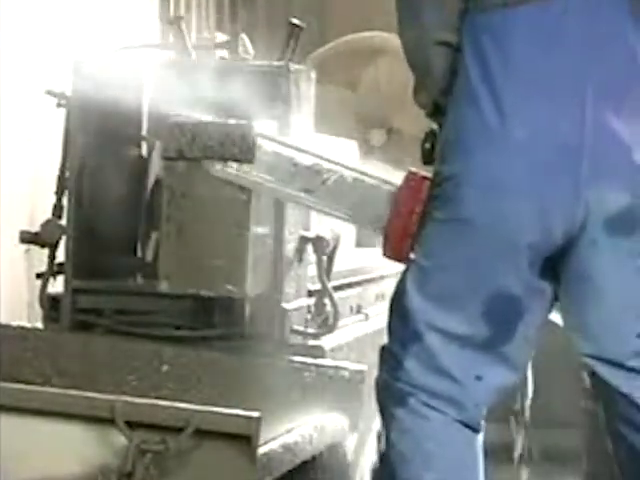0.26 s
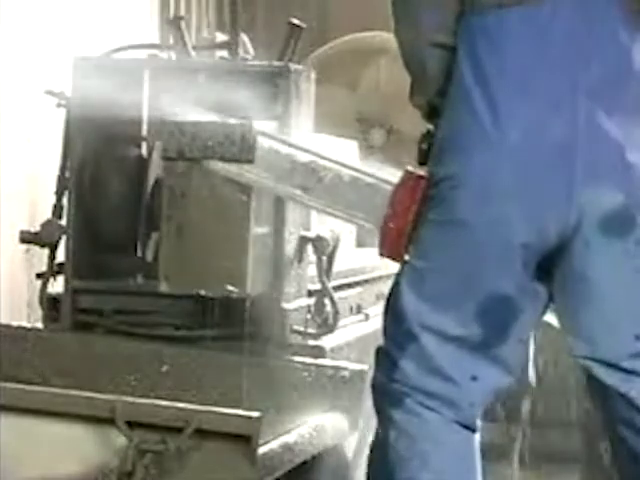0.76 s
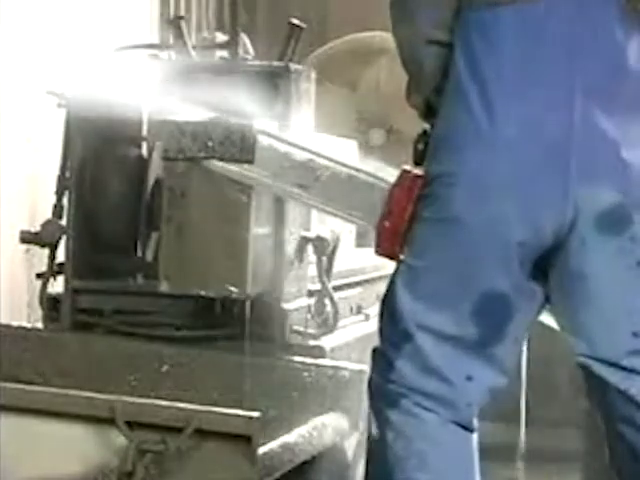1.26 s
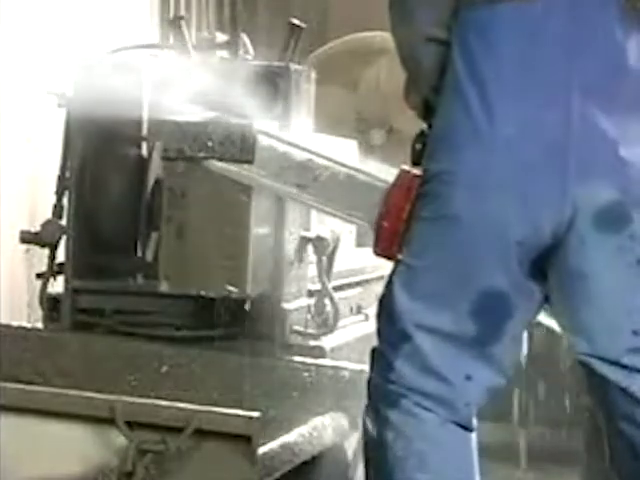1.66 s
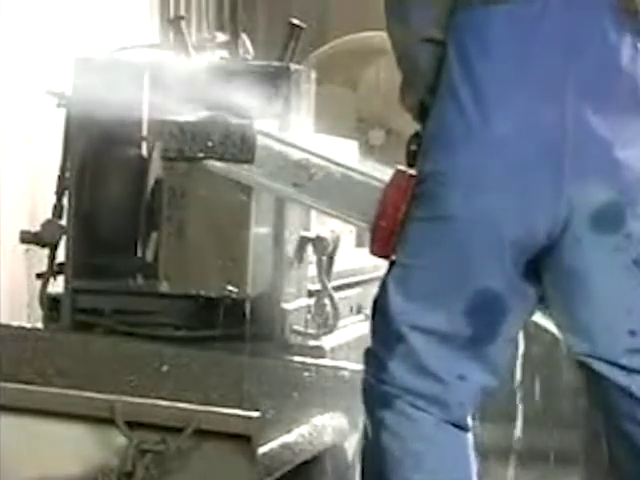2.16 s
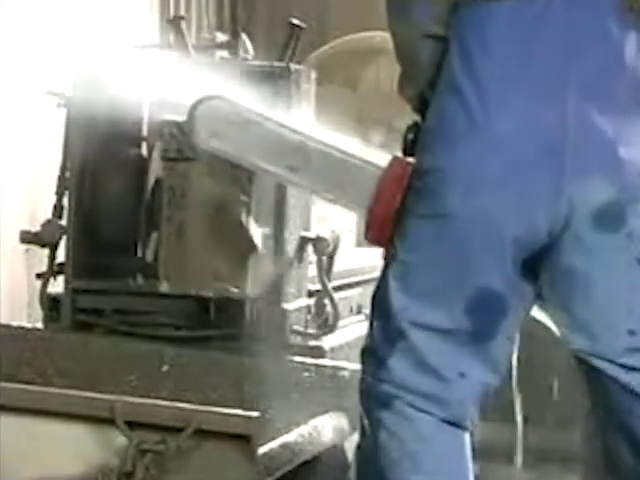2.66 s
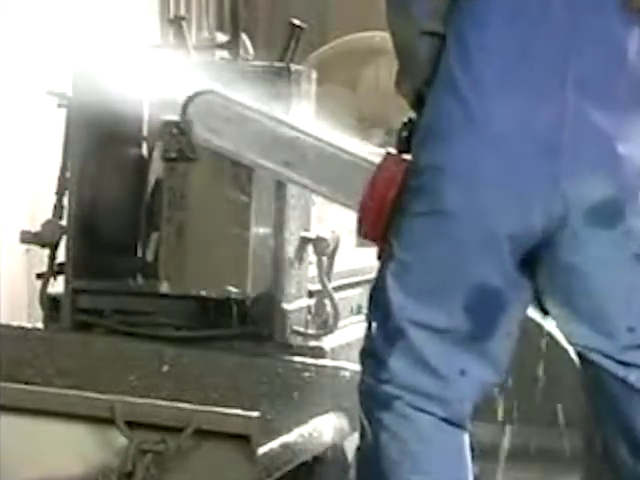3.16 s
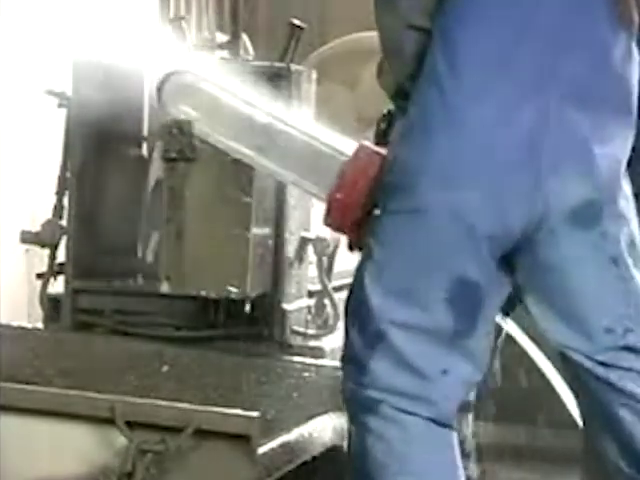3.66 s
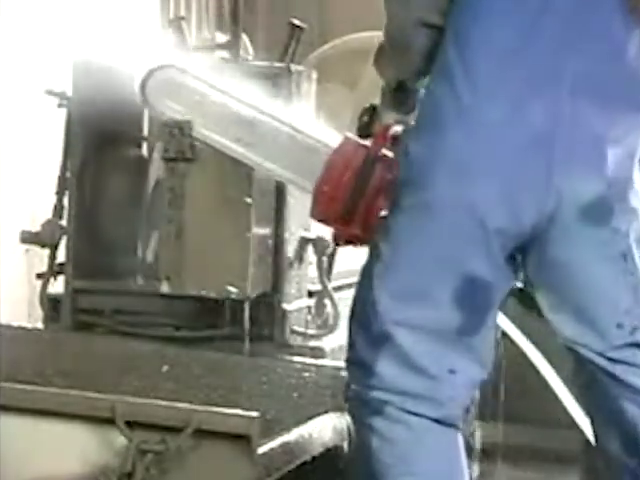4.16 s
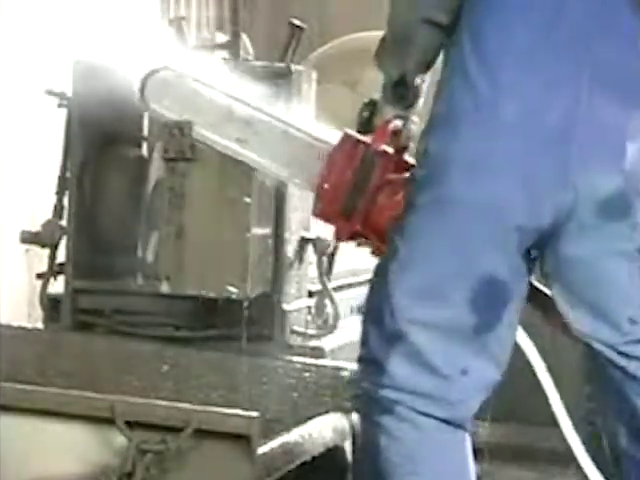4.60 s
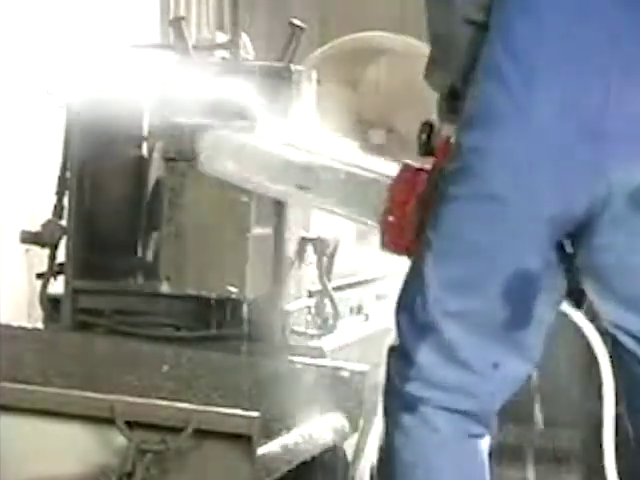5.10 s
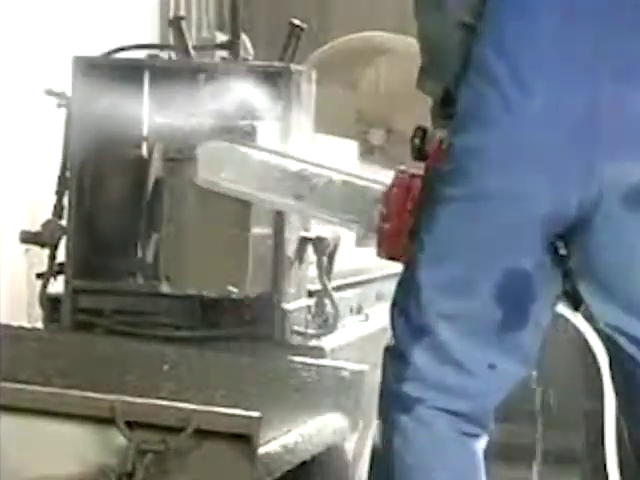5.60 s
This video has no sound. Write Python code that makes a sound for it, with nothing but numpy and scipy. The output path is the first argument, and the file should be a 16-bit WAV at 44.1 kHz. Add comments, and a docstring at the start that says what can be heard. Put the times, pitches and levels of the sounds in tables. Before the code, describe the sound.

An air-powered chain saw cuts wet concrete a few metres away in a hard-walled workshop with a short echo. A loud, bright hiss of exhaust air and water spray runs for the whole six seconds, growing slightly. From the start, the teeth grind with a gritty scrape and the steel bar rings lightly. A faint, wavering motor whine sags at about 0.7 seconds as the saw bites, then climbs by 1.8 seconds. It dips again around 2.3 seconds, with bright raking scrapes until about 2.7. Near 2.9 seconds the chain catches at the edge in a few quick chatters. From about 3.2 seconds the grinding fades away, leaving the hiss and a higher, rougher whine. Brief metallic rings and chain rattles come between 5.2 and 5.8 seconds. A low machine hum and rumble sit quietly underneath throughout.

```python
"""Air chain saw in wet concrete

An air-driven chain saw cuts a block a few metres away in a workshop. Air pulses from its rotor make
a whine that sags under load and climbs as the bar lifts. Diamond teeth scrape grit and ring the steel
bar, exhaust air and water spray hiss throughout, and a machine hums low in the background."""
import sys
import numpy as np
from scipy import signal
from scipy.fft import rfft, irfft
from scipy.io import wavfile
from scipy.ndimage import uniform_filter1d

SR = 44100
rng = np.random.default_rng(int(sys.argv[2]) if len(sys.argv) > 2 else 0)


def bounce(signal):
    """Save signal as a 16-bit WAV file at the path given by the first command-line argument."""
    frames = np.transpose(np.atleast_2d(signal))
    limited = np.clip(frames, -1, 1)
    pcm = np.round(limited * 32767).astype(np.int16)
    wavfile.write(sys.argv[1], SR, pcm)


N = 257544


# The saw is pressed in and eased off. Each row: time in seconds, rotor speed in Hz.
ROTOR_SPEED = [(0, 467.2), (.35, 471), (.5, 453.4), (.68, 396.6), (.84, 396), (.97, 466), (1.12, 506.8),
               (1.45, 509.6), (1.77, 581), (1.95, 540.8), (2.08, 535.7), (2.22, 484.7), (2.34, 460.1),
               (2.44, 473), (2.58, 504), (2.74, 514.4), (2.92, 586.5), (3.12, 593.6), (3.33, 551),
               (3.58, 540.8), (3.78, 616.4), (4.04, 562), (4.45, 548.1), (4.76, 565), (4.87, 647.7),
               (5.12, 623), (5.26, 598.6), (5.51, 595.4), (5.64, 545), (5.84, 551)]
def rotor_speed(inertia_s=0.085):
    """The vane motor's speed in Hz; the mass of rotor and chain rounds off every change."""
    return uniform_filter1d(curves(ROTOR_SPEED)[0], int(inertia_s * SR))


def motor(hz, jitter=0.0056):
    """The motor's pitched voice. Snags of the chain jerk its speed, the more so when it races."""
    unevenness = jitter * (hz / np.mean(hz)) ** 4
    angle = turn(hz * (1 + unevenness * walk(83)))
    return whine(hz, angle) + singing(angle) + growl(angle)


# The muffler's tone, with a metallic peak near 1.8 kHz. Each row: frequency in Hz, level in dB.
MUFFLER_TONE = [(770, -32), (870, -30.5), (945, -32), (1020, -31), (1110, -38.5), (1180, -41.5),
                (1270, -37.5), (1410, -44.5), (1520, -43.5), (1660, -41.5), (1740, -42.5), (1780, -38),
                (1835, -40), (1920, -36)]
# Weaker overtones. Each row: multiple of the rotor speed, level in dB against the second order.
UPPER_ORDERS = [(4, -10)]
def whine(hz, angle, held_hz=497, rattle_hz=582, waver_db=2.26):
    """Air pulses sweep through the muffler's tone; at speed the chain rattles loose and smears them."""
    second_db = spectrum_at(2 * hz, MUFFLER_TONE)
    third_db = spectrum_at(3 * hz, MUFFLER_TONE)
    orders = [(2, second_db), (3, third_db)] + [(k, second_db + db) for k, db in UPPER_ORDERS]
    held = sum(undb(db) * partial(k * angle, rough=0.28, spread_hz=42) for k, db in orders)
    rattling = sum(undb(db) * partial(k * angle, rough=0.97, spread_hz=110) for k, db in orders)
    loose_share = np.interp(hz, [held_hz, rattle_hz], [0, 0.7])
    blend = np.sqrt(1 - loose_share) * held + np.sqrt(loose_share) * rattling
    return blend * undb(waver_db * flutter(7))


# Clean moments in the whine. Each row: peak time in seconds, half-width in seconds, level in dB.
CLEAN_SWELLS = [(.14, 0.027, -25.5), (.3, 0.037, -27), (1.03, 0.012, -34), (1.19, 0.022, -30),
                (1.82, .08, -35), (2.24, 0.027, -29), (2.42, 0.029, -33)]
def singing(angle):
    """The chain runs evenly in the kerf and the second order sings out clean."""
    return swells(CLEAN_SWELLS) * np.sqrt(2) * np.cos(2 * angle)


# Deep bites. Each row: peak time in seconds, half-width in seconds, level in dB.
DEEP_BITES = [(.21, 0.023, -42), (.49, 0.036, -40), (.78, 0.21, -37), (1.02, 0.035, -40.5),
              (1.31, 0.019, -34), (1.47, 0.024, -35.5), (2.25, 0.019, -40), (2.47, 0.062, -36)]
def growl(angle):
    """The teeth bite deep and the motor growls at its first order."""
    return swells(DEEP_BITES) * partial(angle, rough=0.4, spread_hz=35)


# Rings in the whine. Each row: peak time in seconds, half-width in seconds, level in dB.
WHINE_RINGS = [(3.05, 0.032, -35.5), (5.32, 0.039, -31.5), (5.49, 0.037, -30)]
def whine_rings(judder, pitch_hz=1788, width_hz=62):
    """Brief metallic rings near 1.8 kHz as the racing motor's third order meets the muffler's peak."""
    return ring([(pitch_hz, width_hz, 0)], judder) * swells(WHINE_RINGS)


def cutting(load, judder_db=1.06):
    """The saw's scraping, ringing and shaking. One judder roughens grit, rubs, whine rings and rakes."""
    judder = undb(judder_db * walk(63))
    bright = grit(load, judder) + rubs(judder) + whine_rings(judder) + guide_bar() + rakes(judder)
    return bright + churn(load) + snatches()


# The bright colour of the grit. Each row: frequency in Hz, level in dB.
GRIT_TONE = [(650, -69), (900, -2), (1200, 0), (1500, 0.5), (2250, 1.5), (3100, 0.5), (3750, 4),
             (4250, -1.5), (4650, 4), (6000, 0), (9000, -1), (15000, -10.5)]
def grit(load, judder, hard_cut_db=-23.5, unloaded_db=-5, clear_s=3.24, fade_s=3.5, fade_db=-45):
    """Crushed grains merge into a hiss that grows with load and dies away as the bar comes clear."""
    clear = np.clip((np.arange(N) / SR - clear_s) / fade_s, 0, 1)
    grains = level(colour(rng.standard_normal(N) * judder, GRIT_TONE), hard_cut_db)
    return grains * undb(unloaded_db * (1 - load) + fade_db * clear)


# The bar's resonances. Each row: pitch in Hz, spread in Hz, relative level in dB.
BAR_MODES = [(2704, 127, -1.5), (2321, 120, -6.5)]
# Its ring as it is pressed on the concrete. Each row: time in seconds, level in dB.
BAR_PRESSURE_RING = [(0, -38), (.35, -34), (.7, -39), (1.0, -33), (1.85, -30.5), (2.3, -33), (2.8, -32),
                     (3.05, -39), (3.6, -36), (4.1, -37), (5.84, -50)]
# The chain slaps the bar. Each row: peak time in seconds, half-width in seconds, level in dB.
CHAIN_SLAPS = [(.06, 0.055, -27), (2.0, .03, -41), (3.63, 0.092, -33), (5.74, 0.06, -30.5)]
def guide_bar(wander=0.016, flicker_db=1.3, shifts_per_s=14):
    """The steel bar rings loosely; the shifting contact detunes it and makes it come and go."""
    detune = 1 + wander * flutter(shifts_per_s)
    modes = sum(undb(db) * partial(turn(hz * detune), rough=0.94, spread_hz=spread)
                for hz, spread, db in BAR_MODES)
    flicker = undb(flicker_db * flutter(shifts_per_s))
    pressed = undb(curves(BAR_PRESSURE_RING)[0])
    return modes * flicker * np.hypot(pressed, swells(CHAIN_SLAPS))


# The teeth's resonances. Each row: pitch in Hz, width in Hz, relative level in dB.
TOOTH_MODES = [(3530, 220, -11), (3710, 170, -5), (4080, 260, -12), (4560, 700, -9)]
# Raking strokes. Each row: peak time in seconds, half-width in seconds, level in dB.
RAKE_SWELLS = [(.05, .1, -30), (.72, 0.11, -35), (2.3, 0.081, -30), (2.56, 0.13, -27), (3.25, 0.12, -38),
               (5.25, 0.074, -34)]
def rakes(judder):
    """The teeth rake along the edge and ring in bright swells."""
    return ring(TOOTH_MODES, judder) * swells(RAKE_SWELLS)


# Side rubs. Each row: peak time in seconds, half-width in seconds, level in dB.
KERF_RUBS = [(0.9, 0.25, -37), (1.6, 0.31, -32)]
def rubs(judder, pitch_hz=6900, width_hz=310):
    """The bar rubs the wall of the kerf and rings high."""
    return ring([(pitch_hz, width_hz, 0)], judder) * swells(KERF_RUBS)


# The chatter's resonances. Each row: pitch in Hz, width in Hz, relative level in dB.
EDGE_MODES = [(360, 40, 6), (511, 18, 7.5), (789, 28, 8.5), (1160, 650, 2)]
# Quick catches. Each row: peak time in seconds, half-width in seconds, level in dB.
EDGE_SNATCHES = [(2.848, 0.018, -28), (2.94, 0.02, -32), (3.05, 0.015, -37)]
def snatches():
    """The chain snatches at the edge as it leaves the block: short, pitched chatter."""
    return swells(EDGE_SNATCHES) * ring(EDGE_MODES, drive=1)


# The block's low body. Each row: frequency in Hz, level in dB.
BLOCK_TONE = [(60, -21), (105, 2.5), (160, -0.5), (230, -4), (310, -4.5), (370, -25), (450, -38)]
def churn(load, hard_cut_db=-40.5, lump_db=6):
    """The teeth shake the block in uneven lumps, louder the harder the cut."""
    lumps = undb(lump_db * flutter(10))
    shaking = level(colour(rng.standard_normal(N), BLOCK_TONE) * lumps, hard_cut_db)
    return shaking * np.sqrt(np.clip(load, 0, 1))


# The colour of air and spray. Each row: frequency in Hz, level in dB.
JET_TONE = [(750, -112), (960, -8), (1080, -8.5), (1220, -17), (1400, -9), (2200, -3.5), (3100, -2),
            (3700, -0.66), (5500, 0), (8000, -0.3), (10200, -4), (11200, -8), (13700, -6.5), (15000, -15)]
def exhaust(start_db=-20, rise_db_per_s=0.5, dip_s=2.67, dip_half_width_s=0.16, dip_db=-1):
    """A turbulent jet and the chain's spray swell as the saw turns out from behind the worker."""
    t = np.arange(N) / SR
    hiss = level(colour(rng.standard_normal(N), JET_TONE), start_db)
    dip = np.exp(-0.5 * ((t - dip_s) / dip_half_width_s) ** 2)  # the tip comes up through the spray
    flutter_db = 0.44 * walk(40)
    return hiss * undb(rise_db_per_s * t + dip_db * dip + flutter_db)


# The background hum. Each row: time in seconds, pitch in Hz, level in dB.
MACHINE_HUM = [(0.0, 66.14, -28.5), (0.23, 74.9, -30), (2.91, 74.38, -32), (4.23, 70, -33),
               (4.67, 71.06, -48), (5.04, 70.1, -34.5), (5.43, 70.7, -45), (5.63, 68.8, -31.5),
               (5.84, 69.3, -34)]
# The shop's low rumble. Each row: frequency in Hz, level in dB.
SHOP_TONE = [(15, -30), (28, -5), (43, 2.5), (62, -1), (90, 3.5), (135, 5.5), (178, -9), (208, 2.5),
             (245, -0.5), (265, -18.5), (290, -0.5), (345, -41), (385, -56)]
def machine(octave_db=-14, waver_db=0.67, rumble_db=-37, shudder_db=0.3):
    """A machine hums with a weak octave over the uneven rumble of the shop."""
    hz, db = curves(MACHINE_HUM)
    angle = turn(hz * (1 + 0.0035 * walk(6.3)))
    tone = np.sin(angle) + undb(octave_db) * np.sin(2 * angle)
    hum = np.sqrt(2) * undb(db + waver_db * walk(15)) * tone
    rumble = colour(rng.standard_normal(N), SHOP_TONE) * undb(shudder_db * flutter(8.7))
    return hum + level(rumble, rumble_db)


def workshop(x, wet_db, t60_s=0.48):
    """Hard walls add a short diffuse tail to the direct sound."""
    t = np.arange(SR // 2) / SR
    tail = rng.standard_normal(len(t)) * np.exp(-np.log(1000) * t / t60_s)
    return x + undb(wet_db) * signal.fftconvolve(x, tail / np.linalg.norm(tail))[:N]


def partial(angle, rough, spread_hz):
    """A tone at rms 1; the rough share of its power is smeared into a band around its pitch."""
    smear = flutter(spread_hz) * np.sin(angle) + flutter(spread_hz) * np.cos(angle)
    return np.sqrt(2 * (1 - rough)) * np.sin(angle) + np.sqrt(rough) * smear


def ring(modes, drive):
    """Resonances rung by noise that follows the drive, at rms 1."""
    ringing = sum(undb(db) * resonate(rng.standard_normal(N) * drive, hz, width)
                  for hz, width, db in modes)
    return level(ringing, 0)


def resonate(x, hz, width):
    """One steep-sided resonance, gain 1 at its centre."""
    b, a = signal.iirpeak(hz, hz / width, fs=SR)
    return signal.lfilter(b, a, signal.lfilter(b, a, x))


def swells(table):
    """An envelope of bell-shaped swells, one for each row."""
    t = np.arange(N) / SR
    return sum(undb(db) * np.exp(-0.5 * ((t - peak_s) / width_s) ** 2) for peak_s, width_s, db in table)


def curves(table):
    """Each column of a timed table, joined by straight lines."""
    times, *columns = np.transpose(table)
    return [np.interp(np.arange(N) / SR, times, column) for column in columns]


def colour(x, points):
    """Equalise by (Hz, dB) points."""
    f = np.maximum(np.arange(N // 2 + 1) * SR / N, 1)
    return irfft(rfft(x) * undb(spectrum_at(f, points)), N)


def spectrum_at(hz, points):
    """Level of a (Hz, dB) curve at hz, on a log-frequency axis."""
    f, db = np.transpose(points)
    return np.interp(np.log(hz), np.log(f), db)


def walk(rate):
    """A smooth random drift at rms 1 that changes about rate times a second."""
    f = np.arange(N // 2 + 1) * SR / N
    return level(irfft(rfft(rng.standard_normal(N)) / (1 + (2 * f / rate) ** 2), N), 0)


def flutter(rate):
    """A random wobble at rms 1 with nothing faster than about rate times a second."""
    f = np.arange(N // 2 + 1) * SR / N
    return level(irfft(rfft(rng.standard_normal(N)) * np.exp(-(f / rate) ** 2), N), 0)


def turn(hz):
    """Angle of something that spins at hz."""
    return 2 * np.pi * np.cumsum(hz) / SR


def level(x, db):
    """Scale a sound to an rms level."""
    return x * undb(db) / np.sqrt(np.mean(x ** 2))


def undb(db):
    """Decibels to gain."""
    return 10 ** (np.asarray(db) / 20)


def scene():
    """Saw and background, the same in both channels; the slower the motor, the harder the cut."""
    free_hz, hard_cut_hz = 616, 374  # rotor speeds at load 0 and load 1
    hz = rotor_speed()
    load = (free_hz - hz) / (free_hz - hard_cut_hz)
    saw = workshop(motor(hz), wet_db=-12) + workshop(cutting(load), wet_db=-6.5)
    mono = saw + exhaust() + machine()
    return np.array([mono, mono])


# A deep scoop across the whole mix. Each row: frequency in Hz, gain in dB.
LOW_MID_SCOOP = [(370, -0.5), (470, -6.5), (550, -19.5), (600, -78), (680, -33), (730, 2), (775, -5),
                 (900, 1)]
def record(dry):
    """Hollow out the low mids and cut the top steeply at 15 kHz."""
    hollow = np.array([colour(channel, LOW_MID_SCOOP) for channel in dry])
    top_cut = signal.ellip(10, 0.1, 90, 15000, fs=SR, output="sos")
    return signal.sosfilt(top_cut, hollow)


dry = scene()
out = record(dry)
bounce(out)
```